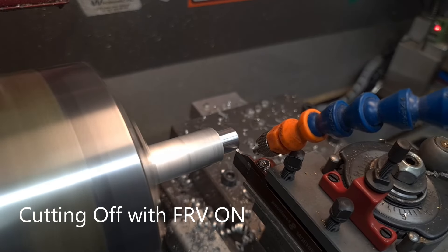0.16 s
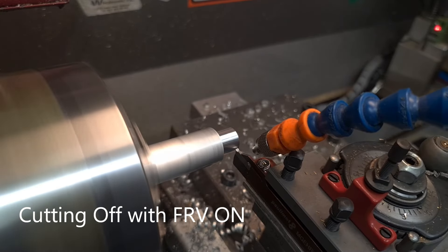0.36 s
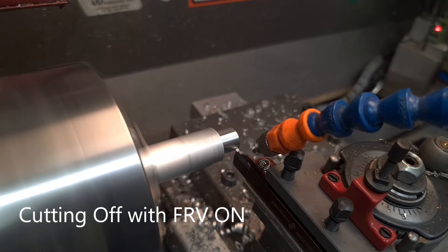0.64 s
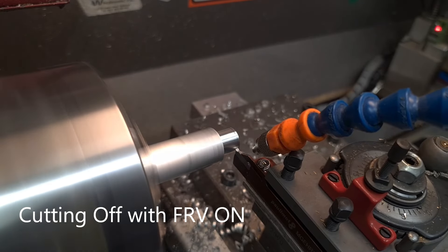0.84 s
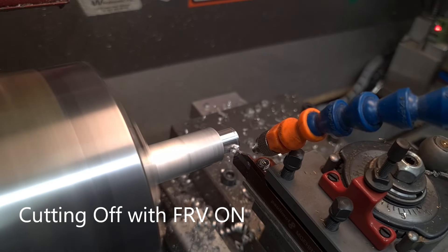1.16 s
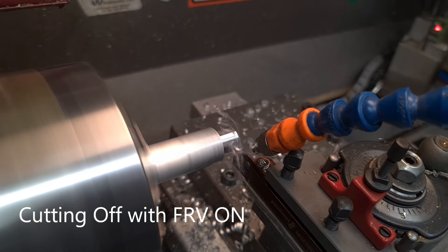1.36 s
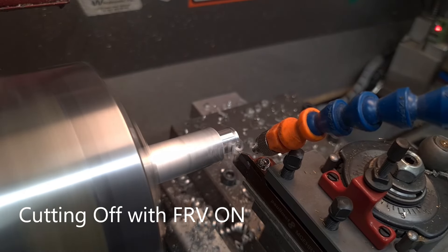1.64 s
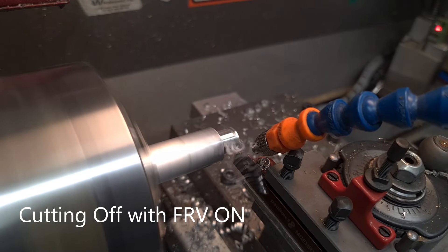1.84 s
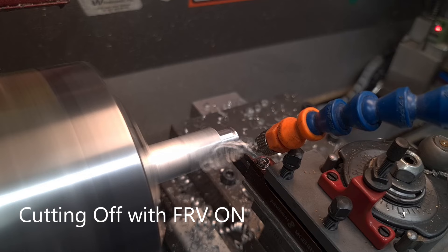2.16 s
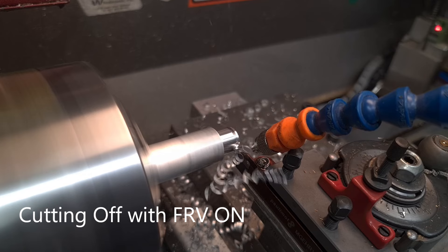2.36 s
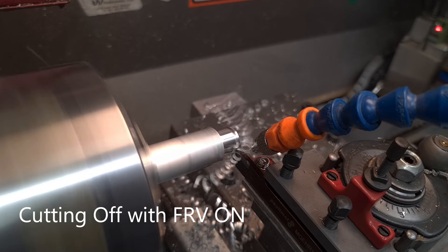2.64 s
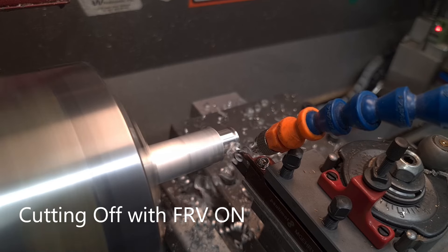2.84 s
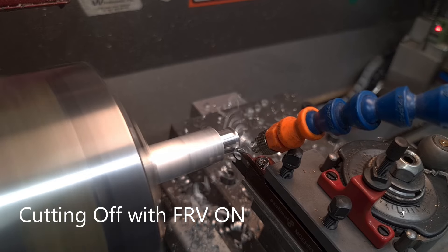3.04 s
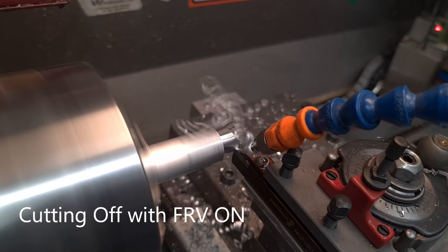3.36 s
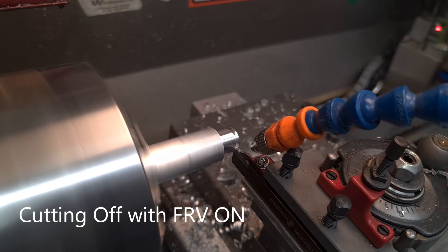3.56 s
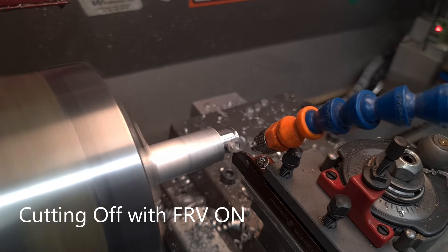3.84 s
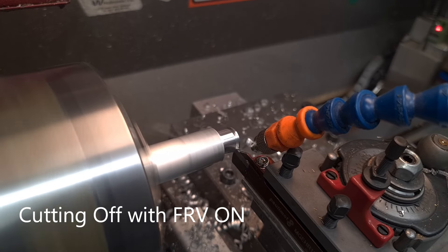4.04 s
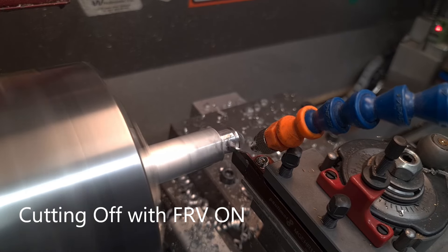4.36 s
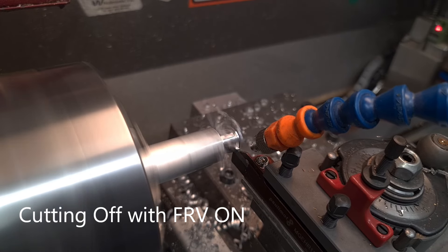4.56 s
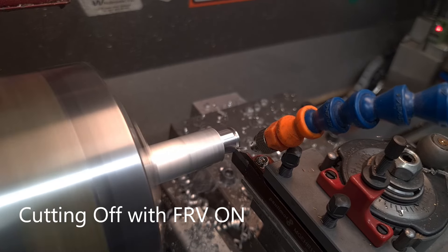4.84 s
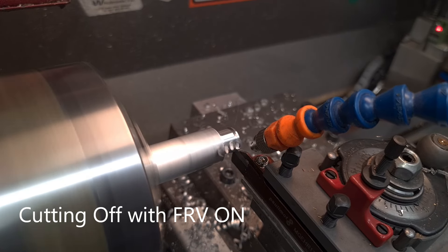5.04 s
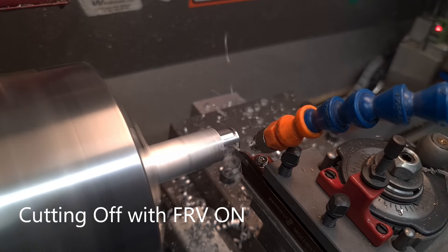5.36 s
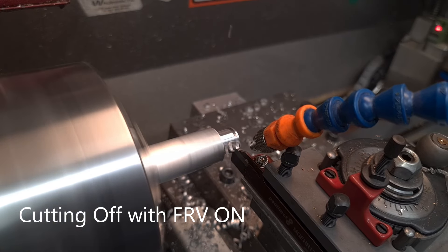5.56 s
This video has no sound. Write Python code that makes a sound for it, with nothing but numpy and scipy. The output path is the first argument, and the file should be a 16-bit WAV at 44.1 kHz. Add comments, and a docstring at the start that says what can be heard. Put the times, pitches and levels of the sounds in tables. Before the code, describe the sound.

A metal lathe whines steadily over rumble and rushing air; a blade squeals as it bites, then the cut hisses, scrapes and ticks.

```python
"""Inside the steel enclosure of a CNC lathe, a pair of microphones hears a metal bar being parted off.
First the idling spindle whines over a low headstock rumble and a steady rush: rotating lines and shaped noise.
Within the first second the cut fades in and the blade squeals as it bites: one ringing burst a turn on two modes.
The speed then swings about twice a second, so the whine wavers; noise and small fractures ring bar and blade
as the cut hisses and scrapes, and from the third second curled chips tick against the tool as short rings."""
import sys
import numpy as np
from scipy import signal
from scipy.fft import rfft, irfft
from scipy.io import wavfile
from scipy.ndimage import uniform_filter1d

SR = 44100
rng = np.random.default_rng(int(sys.argv[2]) if len(sys.argv) > 2 else 0)


def dump_mix(stems):
    """Bounce the given channels to the path in sys.argv[1] as a 16-bit WAV at rate SR."""
    frames = np.atleast_2d(stems).T  # one column per channel
    limited = np.clip(frames, -1, 1)  # hard clip at full scale
    pcm = np.round(limited * 32767).astype(np.int16)
    wavfile.write(sys.argv[1], SR, pcm)


N = 251370
TIME = np.arange(N) / SR
FREQ = np.maximum(np.arange(N // 2 + 1) * SR / N, 1)

# upper whine at mean spindle speed [Hz], and its cycles in one spindle turn
WHINE_HZ, CYCLES_PER_TURN = 920.9, 36.9
# spindle speed swings: (moment of top speed [s], shift of the main whine's lag [rad])
SPEED_SWINGS = [(1.01, 1.4), (1.44, 1.15), (1.83, 1.95), (2.26, 2.55), (2.69, 2.45), (3.13, 1.45),
                (3.57, 1.95), (4.01, 2.4), (4.46, 1.65), (4.9, 1.9), (5.33, 2.1), (5.79, 1.6)]
# modes of bar and holder under the scraping chip, relative levels:
# (frequency [Hz], width [Hz], left [dB], right [dB])
BAR_MODES = [(3650, 250, -9, -8), (4250, 200, -8, -6), (4900, 400, -4, -5), (5270, 180, -1, 1),
             (5570, 200, -1, 2), (6300, 250, -3, 0), (6600, 350, -4, 0), (7210, 220, 2, .5),
             (7660, 260, 2.5, -9), (8350, 380, -6, -7), (9050, 280, -7, -6)]


def undb(db):
    """Decibels to gain."""
    return 10 ** (np.asarray(db) / 20)


def unit(x):
    """Scale to rms 1."""
    return x / np.sqrt(np.mean(x ** 2))


def curves(table):
    """Each column of a time table, sample by sample."""
    s, *columns = np.transpose(table)
    return [np.interp(TIME, s, c) for c in columns]


def across(points):
    """Points joined on a log-frequency axis."""
    hz, value = np.transpose(points)
    return np.interp(np.log(FREQ), np.log(hz), value)


def bell(s, length):
    """A smooth rise and fall around a moment."""
    return np.exp(-np.minimum((2 * (TIME - s) / length) ** 2, 50))


def walk(rate_hz, size=32768):
    """Smooth random wander of rms 1, mostly slower than the given rate."""
    hz = FREQ[:size // 2 + 1]
    coarse = irfft(rfft(rng.standard_normal(size)) / (1 + (hz / rate_hz) ** 4))
    return np.interp(TIME, np.linspace(0, TIME[-1], size), unit(coarse))


def complex_walk(rate_hz):
    """Random wander of level and phase together."""
    return walk(rate_hz) + 1j * walk(rate_hz)


def resonances(modes):
    """Power response of a set of steep-sided modes at the left and right microphone."""
    power = 0
    for hz, width, left, right in modes:
        peak = undb([[left], [right]]) ** 2
        power = power + peak / (1 + (1.46 * (FREQ - hz) / width) ** 2) ** 2
    return power


def stereo_noise(power, grit_db):
    """Grainy noise with the given power per Hz, partly alike at the two microphones."""
    # likeness of left and right: (frequency [Hz], correlation [-1 to 1])
    likeness = [(60, 0.92), (380, 0.88), (560, 0.097), (680, 0.78), (850, -0.11), (1030, 0.33),
                (1180, -0.5), (1450, 0.31), (1800, -0.28), (2100, 0.45), (4000, -0.026), (6500, 0.17),
                (7200, 0.88), (9500, 0.52), (10500, 0.18), (11800, 0.94), (13500, -0.3), (14500, -0.27),
                (15500, 0.074)]
    grains = unit(undb(grit_db * walk(580)))
    mid, side = rfft(rng.standard_normal((2, N)) * grains)
    alike = np.clip(across(likeness), -.99, .99)
    pair = mid * np.sqrt(1 + alike) + np.array([[1], [-1]]) * side * np.sqrt(1 - alike)
    return irfft(pair * np.sqrt(power * SR) / 2, N)


def loaded():
    """Goes from 0 to 1 as the blade takes up the cut."""
    start_s, rise_s = 0.854, 0.36
    return np.clip((TIME - start_s) / rise_s, 0, 1)


def swing(late_s=0):
    """Spindle speed about its mean, -1 to 1, setting in with the load."""
    top_speed_s = np.transpose(SPEED_SWINGS)[0]
    cycles = np.interp(TIME - late_s, top_speed_s, np.arange(len(SPEED_SWINGS)))
    return loaded() * np.cos(2 * np.pi * cycles)


def spindle_phase():
    """Phase of the upper whine: the spindle runs slightly faster unloaded and swings under load."""
    idle_rise_hz, swing_hz = 1.8, 4.2
    hz = WHINE_HZ + idle_rise_hz * (1 - loaded()) + swing_hz * swing()
    return 2 * np.pi * np.cumsum(hz) / SR


def whine_level():
    """Main whine level [dB]; on the left it also grows with speed, peaking ahead of top speed."""
    # main whine, before the left microphone's fixed offset: (time [s], level [dB])
    whine_db = [(0, -21.7), (.8, -20.8), (1.1, -23.3), (1.45, -20.3), (1.85, -18.7), (2.3, -20.2),
                (3, -20.8), (3.55, -20.4), (4, -20.1), (4.25, -21.3), (4.55, -20), (5.7, -21)]
    left_swing_db, lead_s = 1, 0.096
    return curves(whine_db)[0] + np.array([[left_swing_db], [0]]) * swing(-lead_s)


def whine_lag():
    """Each swing shifts the main whine's standing wave between the microphones [rad]."""
    idle_rad, slow_rad = 2.5, 3.4
    # the power makes the lag dwell near its highest at low speed and dip briefly near top speed
    speed = np.clip((1 + swing(late_s=.01)) / 2, 0, 1) ** 1.25
    return idle_rad + loaded() * (slow_rad - idle_rad - curves(SPEED_SWINGS)[0] * speed)


def tone(phase, left_db, right_db, lag, rough, flutter_hz):
    """A rotating line; uneven tooth contact flutters its level and phase."""
    shared = complex_walk(flutter_hz)
    own = np.array([complex_walk(flutter_hz) for _ in range(2)])
    flutter = 1 + rough * (shared + own / 2) / 2
    line = flutter * np.exp(1j * np.array([phase + lag / 2, phase - lag / 2]))
    return unit(line.real) * undb([[left_db], [right_db]])


def drive(phase):
    """Two whines locked to the spindle; the speed swing moves the lower one's standing wave."""
    # overtones of the main whine:
    # (multiple, left level [dB], right level [dB], right lag [rad], roughness [0 to 1])
    overtones = [(2, -33, -40, 1.06, 1), (3, -37, -43.5, 0.15, 1)]
    main_phase = phase * .7628
    main = tone(main_phase, left_db=.8, right_db=0, lag=whine_lag(), rough=.11, flutter_hz=20)
    upper = tone(phase, left_db=-24.5, right_db=-41, lag=.6, rough=.3, flutter_hz=35)
    partials = sum(tone(main_phase * k, left, right, lag, rough, flutter_hz=24.4)
                   for k, left, right, lag, rough in overtones)
    # the upper whine flutters regularly, slower than the spindle turns
    beat = 1 + .36 * np.sin(phase / CYCLES_PER_TURN * .636)
    return main * undb(whine_level()) + upper * beat + partials


def wandering_bands(x, rate_hz=11, count=12):
    """Third-octave bands of the rush rise and fall by random walks; bass and top stay steady."""
    # how far the rush rises and falls: (frequency [Hz], depth [dB])
    depth = [(700, 1.6), (1200, 3), (2100, 2.1), (3000, 3), (4500, 3.3), (6500, 2)]
    spectrum = rfft(x)
    place = 3 * np.log2(FREQ / 500)
    depths_db = np.interp(np.arange(count), place, across(depth))
    out = x
    for k, db in enumerate(depths_db):
        band = irfft(spectrum * np.maximum(1 - np.abs(place - k), 0), N)
        out = out + band * (unit(undb(db * walk(rate_hz))) * undb(1.5) - 1)
    return out


def rush(turn):
    """Bearings, fans and air round the chuck fill the enclosure, whose panels pulse with each turn."""
    # steady rush before its bands wander: (frequency [Hz], level [dB per Hz])
    air_db = [(25, -74.5), (60, -70), (150, -63.5), (330, -63.5), (480, -64.5), (620, -66), (800, -58),
              (1100, -62.7), (1400, -63), (1600, -62.5), (2500, -63.5), (4300, -66.5), (7000, -68.5),
              (9500, -71.5), (15500, -71.5)]
    # enclosure resonances before gain, pulsing and wandering:
    # (frequency [Hz], width [Hz], left [dB per Hz], right [dB per Hz])
    panel_modes = [(552, 12, -66, -59), (623, 9, -55, -57), (664, 10, -52, -47), (682, 10, -43, -50),
                   (730, 20, -58, -62), (905, 25, -49, -57), (945, 25, -55, -51), (1050, 50, -55, -54),
                   (1135, 25, -57, -57), (1195, 35, -55, -55), (1560, 40, -62, -62), (1860, 55, -54, -55),
                   (2000, 50, -57, -63), (2100, 40, -54.5, -53.5), (2330, 55, -59, -64),
                   (2490, 70, -59.5, -63), (2790, 70, -63, -64), (3130, 40, -66, -61),
                   (3400, 120, -68, -64), (3690, 80, -58, -58), (4250, 120, -69, -63),
                   (5450, 450, -66, -61), (6500, 450, -70, -63), (7200, 170, -61, -62),
                   (7650, 150, -59, -72)]
    # gain of the ringing round 2 kHz: (time [s], level [dB])
    mid_gain = [(0, -1.5), (.95, 0), (1.05, -3), (1.4, -1.5), (2.3, -1.5), (3, -2), (3.2, 0.5), (3.55, 0.5),
                (3.7, -.5), (4.3, -1), (4.7, 2), (4.85, -0.5), (5.5, 0), (5.7, -0.5)]
    air = stereo_noise(undb(across(air_db)) ** 2, grit_db=1.2)
    panels = stereo_noise(resonances(panel_modes), grit_db=-0.1) * undb(1.0)
    pulsing = 1 + 0.3 * np.sin(turn) + 0.024 * np.sin(3 * turn)
    both = wandering_bands(air + panels * pulsing)
    mid_hz, mid_width_hz = 2150, 600
    mids = irfft(rfft(both) / (1 + ((FREQ - mid_hz) / mid_width_hz) ** 4), N)
    return both + mids * (undb(curves(mid_gain)[0]) - 1)


def fine_ripple(depth_db, spacing_hz, size=16384):
    """A fine random ripple of gain over frequency, different in each channel."""
    hz = np.linspace(0, SR / 2, size)
    ripple = uniform_filter1d(rng.standard_normal((2, size)), max(int(spacing_hz / hz[1]), 1))
    return unit(np.array([np.interp(FREQ, hz, undb(depth_db * unit(r))) for r in ripple]))


def uneven_treble(x):
    """A fine random ripple over frequency makes the treble slightly uneven."""
    share = np.clip(FREQ / 2500 - 1, 0, 1)
    return irfft(rfft(x) * (1 + share * (fine_ripple(depth_db=2.4, spacing_hz=40) - 1)), N)


def rumble():
    """The headstock rumbles in its low modes, harder under load, and the enclosure booms now and then as chips
    strike it."""
    # low headstock modes before levelling and gain:
    # (frequency [Hz], width [Hz], left [dB per Hz], right [dB per Hz])
    low_modes = [(245, 16, -55, -56), (266, 14, -52, -52.5), (287, 9, -48, -48.5), (316, 13, -50, -51),
                 (365, 8, -58, -60), (394, 7, -57, -58)]
    # brief booms on one mode as chips strike the enclosure: (time [s], pitch [Hz], length [s], level [dB])
    boom_list = [(0.95, 315, 0.09, -29.5), (2.335, 320, 0.1, -25.5), (5.425, 316, 0.1, -25.5)]
    ring = stereo_noise(resonances(low_modes), grit_db=0)
    # slow random swells are evened out, so the rumble stays steady
    slow = np.sqrt(uniform_filter1d(np.mean(ring ** 2, axis=0), SR // 8))
    idle_db = -3  # relative to the loaded rumble
    out = ring / unit(slow) * undb(idle_db * (1 - loaded()) + 1.0)
    for s, hz, length, db in boom_list:
        out = out + undb(db) * bell(s, length) * np.sin(2 * np.pi * (hz * TIME + rng.random()))
    return out


def cut_levels():
    """Scraping and edge hiss [dB] follow the depth of cut and the curls; speed lifts the scraping."""
    # depth of the cut, before trims: (time [s], chip scraping level [dB], edge hiss level [dB])
    depth = [(.8, -26, -30), (1.12, -45.5, -33), (1.35, -29.5, -27.5), (1.9, -31.5, -28.5),
             (2.15, -25, -27.5), (2.8, -27.5, -27.5), (3.05, -27, -26.5), (3.6, -31, -31), (4.1, -35, -31),
             (4.3, -24.5, -29), (4.9, -31.5, -31.5), (5.7, -34, -33)]
    # a curled chip rubs harder as it grows, then snaps off:
    # (snap time [s], growth [s], scraping gain [dB], edge gain [dB])
    curls = [(1.02, 0.13, 10, 0), (1.84, 0.18, 2, 2), (2.66, 0.33, 2, 3), (3.49, 0.65, 6, 1),
             (3.995, 0.53, 10, 6), (4.81, 0.43, 7.5, 8), (5.28, 0.38, 7, 2), (5.68, .2, 9, 2)]
    release_s, snap_hiss_s = 0.073, .055
    scrape_db, edge_db = curves(depth)
    rubbing = sum(np.interp(TIME, (s - growth, s, s + release_s), (0, db, 0))
                  for s, growth, db, _ in curls)
    snapping = sum(db * bell(s, snap_hiss_s) for s, _, _, db in curls)
    # the scraping swings by 1 dB, peaking just ahead of top speed
    return scrape_db + 1 * swing(late_s=-0.088) + rubbing, edge_db + snapping


def rubbed(modes, grit_db, wander_db, wander_hz):
    """Grainy friction rings each mode; the shifting contact favours now one, now another."""
    return unit(sum(stereo_noise(resonances([mode]), grit_db) * undb(wander_db * walk(wander_hz))
                    for mode in modes))


def crackle():
    """The chip breaks in small fractures, each ringing bar and holder in its own mix of modes."""
    cracks_per_s, spread_db = 560, 3.7
    chance = rng.random((int(cracks_per_s * N / SR), 2))
    at = (chance[:, 0] * N).astype(int)
    size = undb(-spread_db * np.log(1 - .97 * chance[:, 1]))
    out = 0
    for hz, width, left, right in BAR_MODES:
        shared, *own = rng.standard_normal((3, len(at)))
        clicks = np.array([np.bincount(at, size * (shared + mic), N) for mic in own])
        response = undb([[left], [right]]) / (1 + 1.33j * (FREQ - hz) / width) ** 2
        out = out + rfft(clicks) * response
    return unit(irfft(out, N))


def cut(turn):
    """Friction and tiny fractures ring bar and blade; run-out presses the edge harder once a turn."""
    # modes of the thin blade, relative levels: (frequency [Hz], width [Hz], left [dB], right [dB])
    blade_modes = [(10500, 600, -5, -2), (11600, 450, 0, 2), (12080, 220, -3, 3), (13000, 600, -5, 0),
                   (13680, 200, -3, -1), (14450, 380, -3, 6), (15500, 600, -7, -2)]
    scrape_db, edge_db = cut_levels()
    engaged = np.clip((TIME - .75) / 0.17, 0, 1)
    load = undb(0.53 * walk(8.9) + 0.28 * np.sin(turn))
    friction = rubbed(BAR_MODES, grit_db=1, wander_db=3.3, wander_hz=12)
    scrape = (friction + undb(-8.5) * crackle()) * undb(scrape_db + .6)
    edge = rubbed(blade_modes, grit_db=1, wander_db=3, wander_hz=18) * undb(edge_db + .4)
    return engaged * load * (scrape + edge)


def struck(s, rise_s, t60):
    """A quick rise to a moment, then a ringing decay."""
    decay = undb(-60 * np.clip((TIME - s) / t60, 0, 2))
    return np.where(TIME < s, bell(s, 2 * rise_s), decay)


def bursts():
    """One squeal a turn on each mode, growing and rising as the edge bites: (s, Hz, dB)."""
    # squealing blade modes: (first burst [s], last burst [s], first pitch [Hz], last pitch [Hz],
    # first level [dB], last level [dB]), before the microphone balance
    squeal_modes = [(.883, 1.002, 3105, 3135, -14.5, -11.7), (.867, 1.025, 3290, 3340, -19, -13)]
    turn_s = CYCLES_PER_TURN / WHINE_HZ
    found = []
    for first, last, first_hz, last_hz, first_db, last_db in squeal_modes:
        for s in np.arange(first, last + turn_s / 2, turn_s):
            hz = np.interp(s, (first, last), (first_hz, last_hz))
            db = np.interp(s, (first, last), (first_db, last_db))
            found.append((s, hz, db))
    return found


def squeals():
    """Stick-slip grabs a mode, lets it ring on roughly with a weak octave; a sliding chip whistles."""
    # both before the microphone balance: (time [s], pitch [Hz], length [s], level [dB])
    # the blade ringing on under the bursts
    blade_ring = [(.935, 3150, 0.05, -21), (.915, 3420, .06, -25), (1.005, 3480, .08, -25),
                  (1.08, 3310, 0.035, -29)]
    # thin whistles of the sliding chip
    whistles = [(1.86, 9010, .55, -47), (2.16, 8550, .05, -39), (3.46, 8480, 0.031, -27),
                (3.97, 8300, .06, -31), (4.803, 8300, 0.047, -29), (5.28, 8400, .05, -32)]
    grip_rough, grip_hz, grip_limit = 0.5, 300, 1.7
    grip = np.array([1 + grip_rough * complex_walk(grip_hz) for _ in range(2)])
    # a soft limit keeps the random roughness from peaking too high
    grip = grip * grip_limit * np.tanh(np.abs(grip) / grip_limit) / np.abs(grip)
    grabs = [(hz, db, struck(s, rise_s=.005, t60=.08)) for s, hz, db in bursts()]
    swells = [(hz, db, bell(s, length)) for table in (blade_ring, whistles)
              for s, hz, length, db in table]
    out = np.zeros((2, N))
    for hz, db, envelope in grabs + swells:
        near = envelope > 1e-3
        ring = grip[:, near] * np.exp(2j * np.pi * (hz * TIME[near] + rng.random()))
        with_octave = (ring + undb(-18) * ring ** 2).imag
        out[:, near] += undb(db) * envelope[near] * with_octave
    return out * undb([[-2.5], [1.5]])


def ticks(width_hz=380, crack_t60=.014, crack_db=-12):
    """Each chip strikes tool or holder with a short crack and rings briefly in a cluster of modes."""
    # chip strikes before the microphone balance: (time [s], ring [Hz], level [dB])
    strikes = [(2.141, 5240, -17.5), (2.3456, 4420, -12.5), (3.2679, 7260, -16), (3.7523, 7640, -18),
               (4.1028, 4390, -12.5), (4.189, 3600, -21), (4.7141, 5420, -17), (5.409, 4590, -16.5),
               (5.4204, 4400, -15)]
    hold_s, ring_t60 = .002, .036  # the chip keeps hold for a moment, then rings out
    own = np.array([complex_walk(width_hz) for _ in range(2)])
    cluster = complex_walk(width_hz) + own / 2
    crack = undb(crack_db) * unit(np.diff(rng.standard_normal((2, N + 1))))
    out = np.zeros((2, N))
    for s, hz, db in strikes:
        near = (TIME >= s) & (TIME < s + 2 * ring_t60)
        t = TIME[near] - s
        wander = cluster[:, near] / np.abs(cluster[:, near])
        ring = (wander * np.exp(2j * np.pi * hz * t)).imag
        ring_fade = np.exp(-np.log(1000) * np.maximum(t - hold_s, 0) / ring_t60)
        crack_fade = np.exp(-np.log(1000) * t / crack_t60)
        out[:, near] += undb(db) * (ring * ring_fade + crack[:, near] * crack_fade)
    return out * undb([[-2], [-.5]])


def scene():
    """The spindle's angle drives the whine and the pulsing of the rush and the cut."""
    phase = spindle_phase()
    turn = phase / CYCLES_PER_TURN
    noises = uneven_treble(rush(turn) + cut(turn))
    return drive(phase) + rumble() + noises + squeals() + ticks()


def record(dry):
    """The recorder cuts the top steeply above 15.75 kHz."""
    return signal.sosfilt(signal.ellip(12, .1, 90, 15750, fs=SR, output="sos"), dry)


dry = scene()
out = record(dry)
dump_mix(out)
```